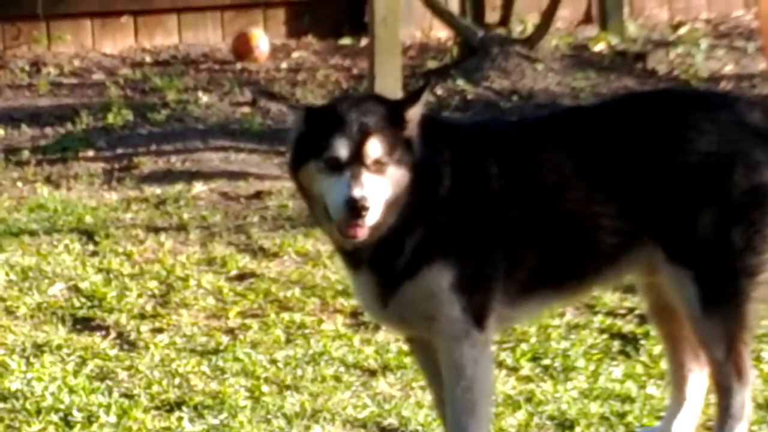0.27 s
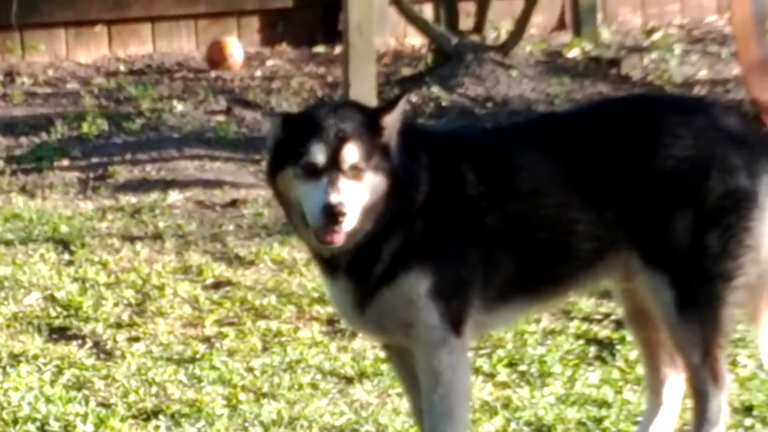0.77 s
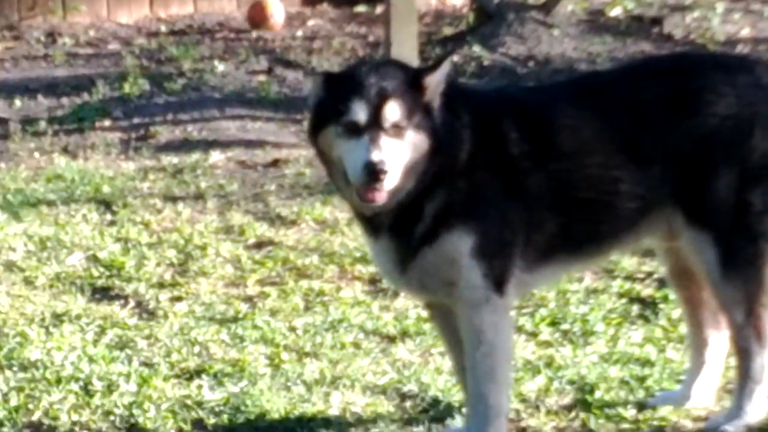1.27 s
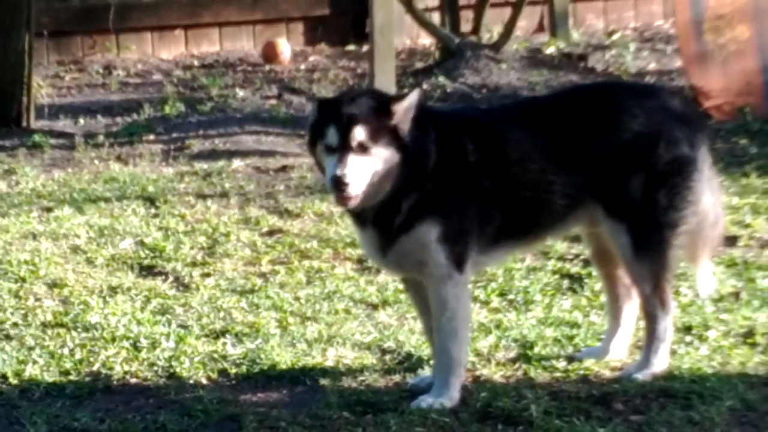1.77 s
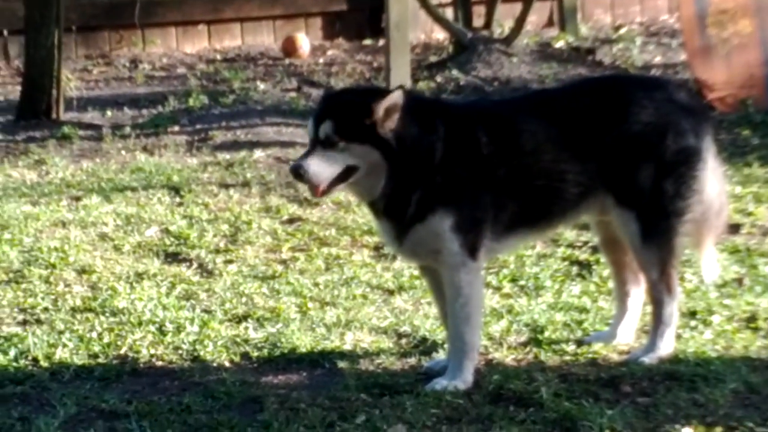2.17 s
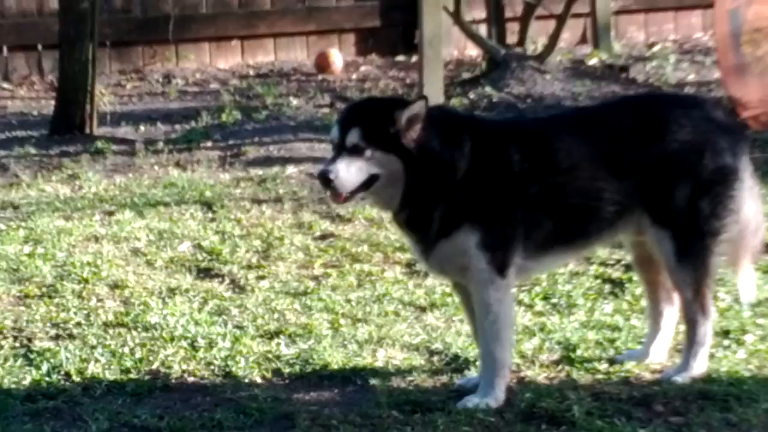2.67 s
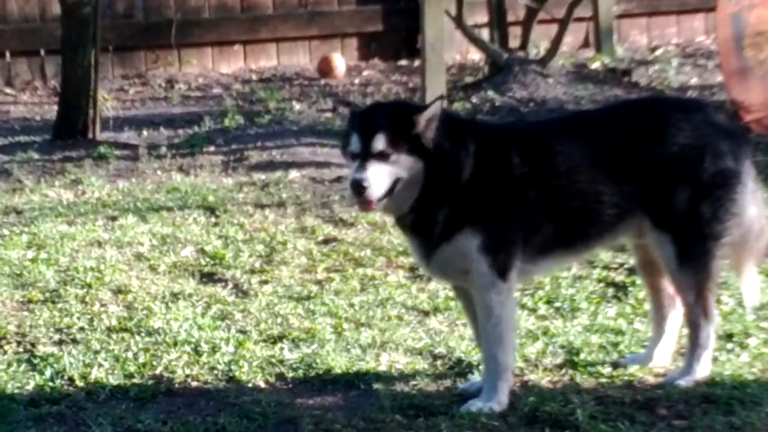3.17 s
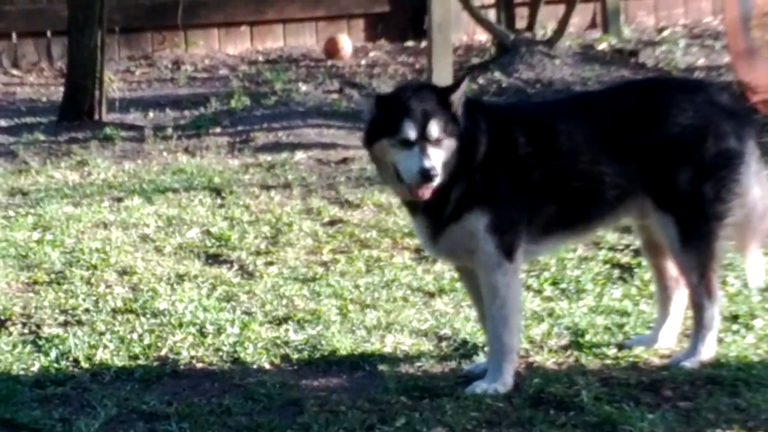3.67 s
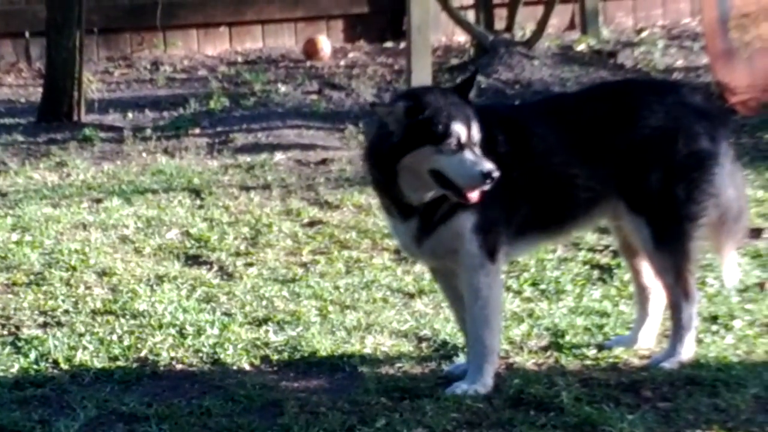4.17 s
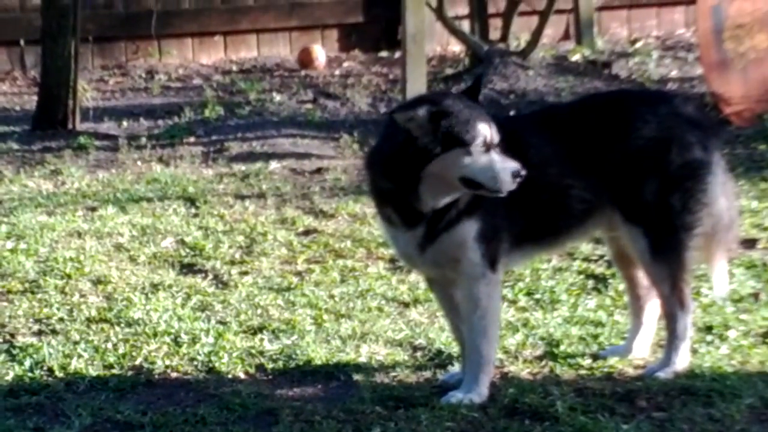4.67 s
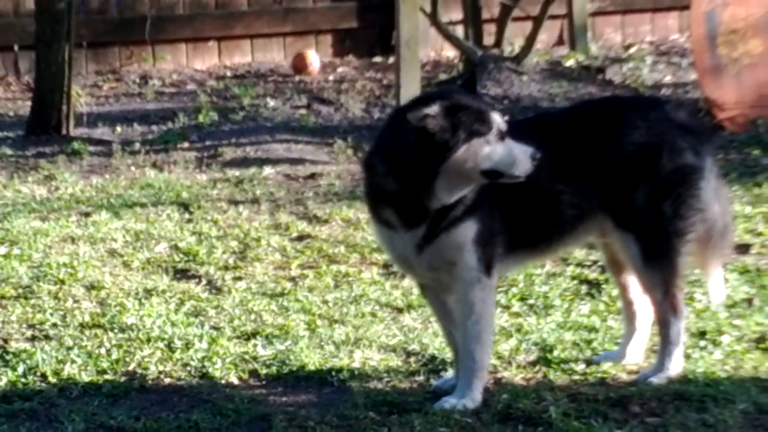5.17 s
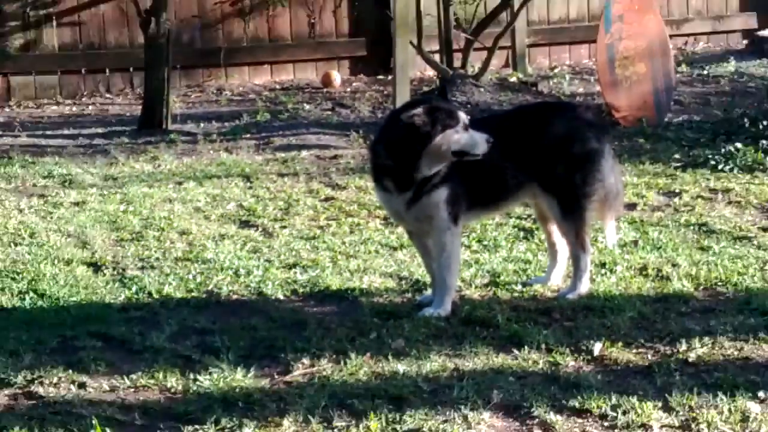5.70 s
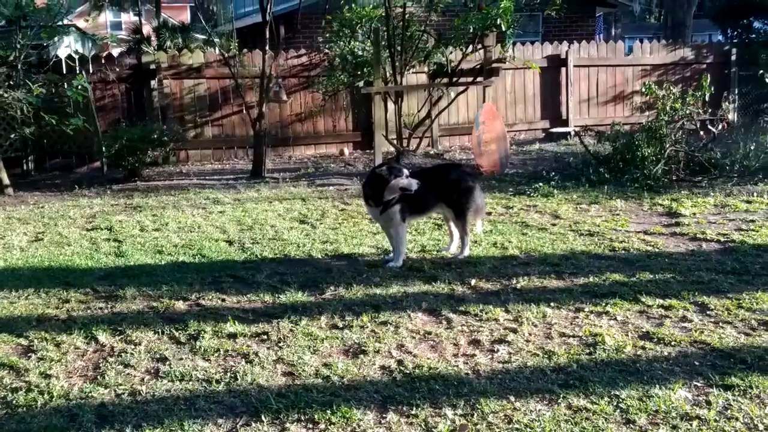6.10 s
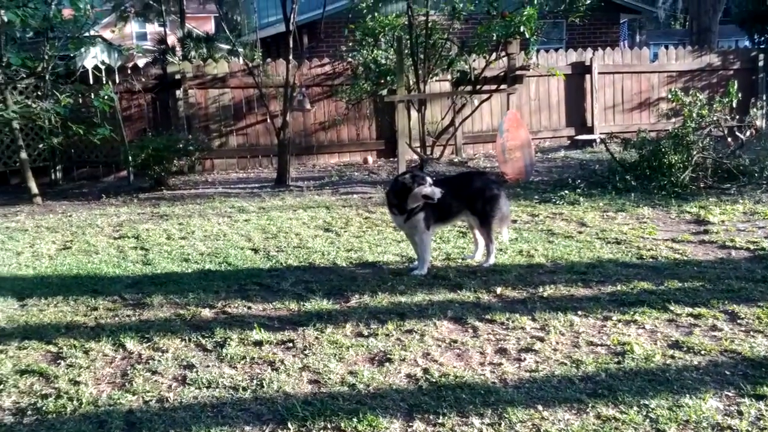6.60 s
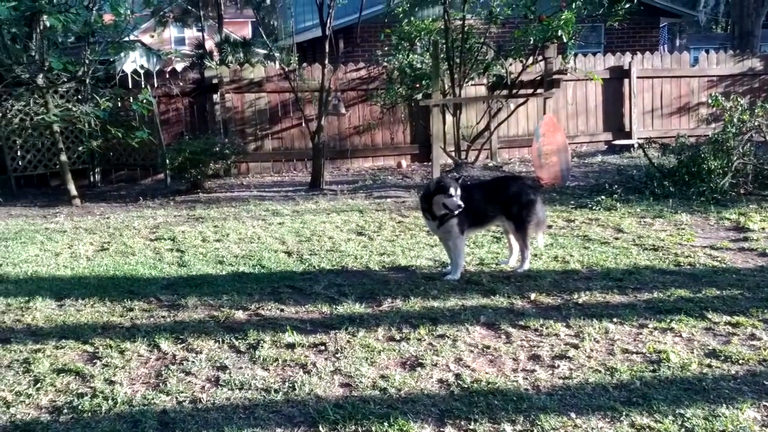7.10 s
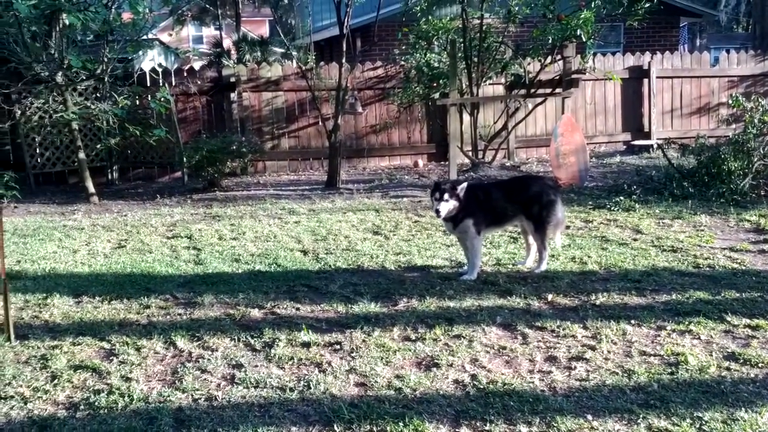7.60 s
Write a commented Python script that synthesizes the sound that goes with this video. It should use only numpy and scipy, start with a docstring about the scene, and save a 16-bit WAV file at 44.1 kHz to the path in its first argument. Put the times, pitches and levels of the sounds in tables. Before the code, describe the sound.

From 0 to 4 seconds a metal impact sprinkler rattles through its quick return, around 38 dry, bright ticks a second fused into a buzzing chatter with a fine hiss of spray, growing stronger from about 2 seconds and easing slightly before the change. Far behind, traffic rumbles softly with a faint hum; a very low engine tone sinks and stops near 2.4. Faint, husky rising bird chirps come from 1.3 to 3.8, with two barely audible low tones at 0.8 and 1.6 and a tiny tap at 1.05. At about 4.05 the sprinkler switches to even, harder metallic clicks, some fourteen a second, each throwing a crisp spit of water, becoming louder and more ringing by 6.5 and continuing to the end. A small dry knock sounds at 5.4; a soft close thump lands around 7.1. Fence and walls return short echoes with a thin outdoor tail.

```python
"""A metal impact sprinkler rattles through a quick return sweep, then strikes slower and harder going forward.
Each strike rings the head as a few decaying modes and chops the jet's filtered noise into a spit of spray.
Ground and grass scatter the ticks; fence and walls echo them as delayed copies and a thin noise tail.
Behind lie a noise rumble, faint hum tones, a far engine's falling sine, gliding bird chirps and low tones.
Two small knocks (struck modes) and soft thumps (pressure pulses) sound close by."""
import sys
import numpy as np
from scipy import signal
from scipy.fft import rfft, irfft
from scipy.io import wavfile

SR = 44100
rng = np.random.default_rng(int(sys.argv[2]) if len(sys.argv) > 2 else 0)


def generate_wav(sig):
    """Save sig (samples, or channels by samples) to the path in sys.argv[1] as 16-bit PCM at SR."""
    pcm = np.round(np.clip(np.atleast_2d(sig).T, -1, 1) * 32767).astype(np.int16)
    wavfile.write(sys.argv[1], SR, pcm)


N = 346185
TIME_S = np.arange(N) / SR


def undb(db):
    """Decibels to amplitude gain."""
    return 10 ** (np.asarray(db) / 20)


def level(x, rms_db):
    """Scale to an rms level."""
    return x * undb(rms_db) / np.sqrt(np.mean(x ** 2))


def curve(table, at, column=1):
    """Interpolate one table column linearly over its first."""
    rows = np.array(table, float)
    return np.interp(at, rows[:, 0], rows[:, column])


def add(out, start_s, sound):
    """Mix a sound in at a time, clipped to the scene's ends."""
    start = int(round(start_s * SR))
    lo, hi = max(start, 0), min(start + len(sound), N)
    if hi > lo:
        out[lo:hi] += sound[lo - start:hi - start]


def highpass(x, order, cutoff_hz):
    """Butterworth high-pass."""
    return signal.sosfilt(signal.butter(order, cutoff_hz, "high", fs=SR, output="sos"), x)


def colour(x, spectrum):
    """Filter by (f/Hz, level/dB) points, keeping the power of white noise."""
    f_hz, level_db = np.transpose(spectrum)
    bins_hz = np.maximum(np.fft.rfftfreq(N, 1 / SR), 1)
    gain = undb(np.interp(np.log(bins_hz), np.log(f_hz), level_db))
    gain = gain * np.minimum(bins_hz / f_hz[0], 1) ** 2  # roll-off below the first point
    return irfft(rfft(x) * level(gain, 0), N)


def walk(knots_per_s):
    """Slow random curve: unit normal knots joined by lines."""
    knots = rng.standard_normal(int(N / SR * knots_per_s) + 2)
    return np.interp(TIME_S * knots_per_s, np.arange(len(knots)), knots)


def decay(t_s, t60_s):
    """Exponential fade of 60 dB per t60."""
    return np.exp(-np.log(1000) * t_s / t60_s)


def ring(f_hz, t60_s, level_db, t_s):
    """Sum of struck modes: exponentially fading sines."""
    modes = decay(t_s, t60_s[:, None]) * np.sin(2 * np.pi * f_hz[:, None] * t_s)
    return undb(level_db) @ modes


def glide(length_s, start_hz, end_hz, quaver=0, quaver_per_s=300):
    """Sine that swells, slides and fades; random pitch quaver makes it husky."""
    f_hz = np.linspace(start_hz, end_hz, int(length_s * SR))
    f_hz = f_hz * (1 + quaver * walk(quaver_per_s)[:len(f_hz)])
    return np.sqrt(2) * np.hanning(len(f_hz)) * np.sin(2 * np.pi * np.cumsum(f_hz) / SR)


# far traffic spectrum: f/Hz, relative density/dB
SUBURB_SPECTRUM = [(20, 2.5), (35, 5), (65, 4), (100, -0.5), (160, -7.5), (230, -8.5), (320, -16),
                   (480, -16.5), (800, -13.5), (1200, -17), (1700, -19.5), (2600, -28), (6000, -34)]


def suburb(rms_db=-45, swell_db=.4):
    """Far traffic: coloured noise with a slow swell."""
    air = level(colour(rng.standard_normal(N), SUBURB_SPECTRUM), rms_db)
    return air * undb(swell_db * walk(2.95))


# hum tones of a distant machine: f/Hz, rms level before waver/dB
HUM_TONES = [(120, -53.5), (986, -71.5), (1044, -73), (1217, -71.5)]


def hum(waver_db=2.0, waver_rad=.5):
    """Steady sines wavering in phase and level."""
    out = np.zeros(N)
    for f_hz, rms_db in HUM_TONES:
        tone = np.sin(2 * np.pi * f_hz * TIME_S + waver_rad * walk(4))
        out += level(tone, rms_db) * undb(waver_db * walk(3))
    return out


# engine loudness, silent after the last row: t/s, rms level before flutter/dB
ENGINE_LOUDNESS = [(0, -54), (.35, -46), (.6, -38), (1, -38.5), (1.85, -42), (2.2, -36), (2.45, -65)]


def engine(start_hz=42.4, sag_hz_per_s=3.9, flutter_db=1):
    """Far engine: a low sine running down steadily until it stops."""
    phase = 2 * np.pi * np.cumsum(start_hz - sag_hz_per_s * TIME_S) / SR
    running = TIME_S < ENGINE_LOUDNESS[-1][0]
    gain = undb(curve(ENGINE_LOUDNESS, TIME_S) + flutter_db * walk(9.2))
    return np.sqrt(2) * np.sin(phase) * gain * running


# far bird's rising chirps: mid t/s, level/dB
BIRD_CHIRPS = [(1.31, -54), (1.58, -53), (1.861, -52), (2.17, -55), (2.43, -51), (2.75, -52), (3.13, -53),
               (3.75, -55)]


def bird(chirp_s=0.123, start_hz=2450, end_hz=3050, pitch_scatter=0.0198):
    """Husky upward glides, each at a slightly different pitch."""
    out = np.zeros(N)
    for mid_s, level_db in BIRD_CHIRPS:
        pitch = 1 + pitch_scatter * rng.standard_normal()
        chirp = glide(chirp_s, pitch * start_hz, pitch * end_hz, quaver=0.036)
        add(out, mid_s - chirp_s / 2, undb(level_db) * chirp)
    return out


# faint low tones from far off: mid t/s, length/s, start f/Hz, end f/Hz, level/dB
FAR_TONES = [(0.758, .17, 345, 354, -53.5), (1.6, .2, 220.5, 158, -51)]


def far_tones():
    """Plain low sines that slide as they swell and fade."""
    out = np.zeros(N)
    for mid_s, length_s, start_hz, end_hz, level_db in FAR_TONES:
        add(out, mid_s - length_s / 2, undb(level_db) * glide(length_s, start_hz, end_hz))
    return out


# soft close bumps: t/s, level before high-pass/dB
SOFT_THUMPS = [(6.995, -34), (7.12, -27), (7.1250, -10)]


def thumps(width_s=0.0012, edge_s=0.00024, edge_db=-16, low_hz=85):
    """One push and pull of pressure each, with a firmer, briefer contact in its middle."""
    out = np.zeros(N)
    for mid_s, level_db in SOFT_THUMPS:
        u = (TIME_S - mid_s) / np.array([[width_s], [edge_s]])
        soft, firm = -np.pi * u / (1 + u ** 2 / 2) ** 2 / 2
        out += undb(level_db) * (soft + undb(edge_db) * firm)
    # zero phase: keeps the pulse symmetric
    return signal.sosfiltfilt(signal.butter(1, low_hz, "high", fs=SR, output="sos"), out)


# dry taps: t/s, gain/dB
KNOCK_TIMES = [(1.0526, -32.5), (5.4079, -18.5)]
# modes of the tapped object: f/Hz, t60/s, relative level/dB
KNOCK_RING = [(750, .008, -25), (1180, .008, -15), (1995, .015, -2), (2200, .01, -9.5), (3230, .008, -9)]


def knocks(low_hz=500):
    """Two dry taps ringing the modes of something small and hard."""
    out = np.zeros(N)
    tap = ring(*np.transpose(KNOCK_RING), TIME_S[:SR // 10])
    for start_s, gain_db in KNOCK_TIMES:
        add(out, start_s, undb(gain_db) * tap)
    return highpass(out, 2, low_hz)


# discrete echoes from fence and walls: delay/s, level/dB
WALL_ECHOES = [(.0228, -29), (0.024, -29), (.0341, -34), (0.0465, -28), (.0522, -32), (.058, -48)]


def yard(x, t60_s=0.52, scatter_db=-19, build_s=0.012):
    """Clear echoes from flat faces plus a thin tail scattered by boards and shrubs."""
    t_s = TIME_S[:SR // 2]
    build = 1 - np.exp(-(t_s / build_s) ** 2)
    tail = rng.standard_normal(len(t_s)) * decay(t_s, t60_s) * build
    response = tail * undb(scatter_db) / np.linalg.norm(tail)
    for delay_s, level_db in WALL_ECHOES:
        response[int(delay_s * SR)] += undb(level_db)
    return signal.fftconvolve(x, response)[:N]


def grass(x, t60_s=0.025, scatter_db=-22, first_s=0.0012):
    """Ground and grass scatter each tick within milliseconds, by one fixed response."""
    t_s = TIME_S[:SR // 20]
    response = rng.standard_normal(len(t_s)) * decay(t_s, t60_s) * (t_s > first_s)
    response *= undb(scatter_db) / np.linalg.norm(response)
    return x + signal.fftconvolve(x, response)[:N]


def sweep(pace, loudness, scatter_db, limp_db=0, jitter_s=.00015):
    """Rows (t/s, level/dB): one strike per arm swing, from the integrated pace, with scatter."""
    t_s = TIME_S[(TIME_S >= pace[0][0]) & (TIME_S < pace[-1][0])]
    swings = np.cumsum(curve(pace, t_s)) / SR
    strike = np.arange(int(swings[-1]) + 1)
    strike_s = np.interp(strike, swings, t_s)
    chance = rng.standard_normal((len(strike_s), 2))
    limp = limp_db * (-1) ** strike  # hard and soft by turns
    strike_db = curve(loudness, strike_s) + limp + scatter_db * chance[:, 1]
    return np.c_[strike_s + jitter_s * chance[:, 0], strike_db]


# arm pace on the quick return, first to last strike: t/s, rate/Hz
RETURN_PACE = [(.0266, 37.535), (1, 37.29), (2.3, 37.66), (3, 37.71), (3.3, 38.13), (4, 38.04)]
# arm pace going forward: t/s, rate/Hz
FORWARD_PACE = [(4.0544, 14.382), (5.4, 14.431), (6.1, 14.335), (7.85, 14.3)]
# strike loudness on the return: t/s, level before scatter/dB
RETURN_LOUDNESS = [(0, -29), (1.1, -27.5), (1.9, -24), (3.05, -23), (3.25, -25), (4, -26.5)]
# strike loudness going forward: t/s, level before scatter/dB
FORWARD_LOUDNESS = [(4.05, -20), (4.9, -20), (6.5, -15.2), (7.85, -14.9)]


def arm_strikes():
    """The arm rattles through the return, then swings wide and strikes harder going forward."""
    returning = sweep(RETURN_PACE, RETURN_LOUDNESS, scatter_db=.9, limp_db=.6)
    forward = sweep(FORWARD_PACE, FORWARD_LOUDNESS, scatter_db=.4)
    return np.vstack([returning, forward])


# spray round one strike: t after strike/s, relative level on return/dB, relative level forward/dB
SPIT_SHAPE = [(-.006, -40, -38), (-.0028, -0.5, -19), (-.0012, -16, -6), (0, 4, 4), (.002, -0.5, 2),
              (.006, -5.5, -7.5), (.0095, -1.5, -3), (.011, 0.5, -4.5), (.0122, 2, -9), (.015, -37, -20)]
# water strength: t/s, spit gain/dB, steady jet level before flutter/dB
WATER_STRENGTH = [(0, -36.5, -44), (1.2, -34.5, -44.5), (2.5, -37, -43), (3.95, -35, -44),
                  (4.05, -34.5, -46), (6, -32.5, -47), (7.85, -34.5, -47.5)]
# colour of the flung drops: f/Hz, relative level/dB
SPRAY_SPECTRUM = [(1500, -16.5), (2600, -12), (3500, -4), (4500, 0.5), (5200, -5), (6600, 2.5), (7300, -1),
                  (8200, 0), (9500, -1.5), (11800, -0.5), (13500, -8.5), (15200, -16.5)]
# colour of the jet in its nozzle: f/Hz, relative level/dB
JET_SPECTRUM = [(1200, -11.5), (2200, -15.5), (2700, -4.5), (3500, -3.5), (3900, 0), (4200, -1),
                (4550, 3.5), (5200, -5.5), (6000, -0.5), (6800, 5), (8500, -5.5), (11500, -3),
                (13500, -6.5), (15500, -18)]


def water(strikes, drops_db=2.5, flutter_db=1.0, spit_scatter_db=.8):
    """The jet hisses; the arm cuts in just before each strike and flings drops until it swings out."""
    t_s = np.arange(SPIT_SHAPE[0][0], SPIT_SHAPE[-1][0], 1 / SR)
    return_db, forward_db = curve(SPIT_SHAPE, t_s, 1), curve(SPIT_SHAPE, t_s, 2)
    spits = np.zeros(N)
    for strike_s, _ in strikes:
        shape_db = return_db if strike_s < RETURN_PACE[-1][0] else forward_db
        add(spits, strike_s + t_s[0], undb(shape_db + spit_scatter_db * rng.standard_normal()))
    # grainy noise: fast random level
    drops = level(rng.standard_normal(N) * undb(drops_db * walk(2500)), 0)
    spray = colour(drops * spits * undb(curve(WATER_STRENGTH, TIME_S, 1)), SPRAY_SPECTRUM)
    jet_db = curve(WATER_STRENGTH, TIME_S, 2) + flutter_db * walk(9.8)
    jet = colour(rng.standard_normal(N), JET_SPECTRUM) * undb(jet_db)
    return spray + jet


# head modes: nominal f/Hz, t60/s, then relative level/dB in each of four poses:
# return start, return end, forward start, later forward
HEAD_MODES = [(2663, 0.007, -14, -43, -34, -37), (3340, 0.0074, -38, -25, -16.5, -30),
              (3955, 0.015, -16, -14.5, -16, -17), (4426, 0.014, -18, -15, -14.5, -8),
              (5200, 0.005, -15.5, -16, -16, -14.5), (6140, 0.013, -15, -23, -10.5, -38),
              (6595, 0.01, 0.5, 1.5, -0.5, 3), (7030, 0.0041, -22, -32, -22, 7.5),
              (7040, 0.022, -9.5, -11.5, -25, -10), (7600, 0.006, -34, -38, -11, -13),
              (8100, 0.0013, -20, -8, -21, -34), (10520, 0.015, -18, -26, -22, -18.5),
              (11050, .0024, -19, -25, -20, -20)]
# turning of the head: t/s, pose index (0-3)
HEAD_POSE = [(1.7, 0), (3.3, .9), (3.99, 1), (4.04, 2), (4.9, 2.1), (6.3, 3)]


def head(strikes, contact_s=.00015, low_hz=2100, gain_db=-0.1, detune=.003, mode_scatter_db=1.5):
    """The arm rings the head; the modes facing the listener change as it turns."""
    f_hz, t60_s, *poses_db = np.transpose(HEAD_MODES)
    t_s = np.arange(int(.025 * SR)) / SR
    attack = t_s < .0034  # span that sets the strike level
    onset = 1 - np.exp(-(t_s / contact_s) ** 2)
    out = np.zeros(N)
    for strike_s, strike_db in strikes:
        chance = rng.standard_normal((2, len(f_hz)))
        # blend the two nearest poses
        shares = np.maximum(1 - np.abs(np.arange(len(poses_db)) - curve(HEAD_POSE, strike_s)), 0)
        mode_db = 20 * np.log10(shares @ undb(poses_db)) + mode_scatter_db * chance[0]
        click = ring(f_hz * (1 + detune * chance[1]), t60_s, mode_db, t_s) * onset
        click *= undb(strike_db + gain_db) / np.std(click[attack])
        add(out, strike_s - contact_s / 2, click)
    return highpass(out, 4, low_hz)  # so small a body radiates no bass


def scene(taps_room_db=5):
    """Sprinkler, knocks and far calls echo in the yard; thumps and background stay dry."""
    background = suburb() + hum() + engine()
    far_calls = bird() + far_tones()
    taps = knocks()
    strikes = arm_strikes()
    lawn = far_calls + water(strikes) + grass(head(strikes))
    echoes = yard(lawn + undb(taps_room_db) * taps)
    return (background + thumps() + taps + lawn + echoes)[None]


def record(dry, top_hz=15850):
    """Steep elliptic low-pass cuts the top treble."""
    return signal.sosfilt(signal.ellip(10, .2, 80, top_hz, fs=SR, output="sos"), dry)


dry = scene()
out = record(dry)
generate_wav(out)
```